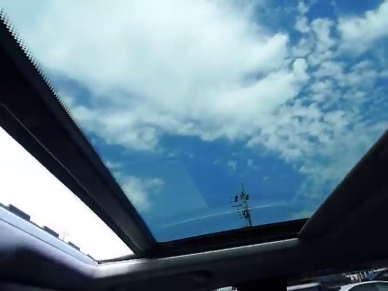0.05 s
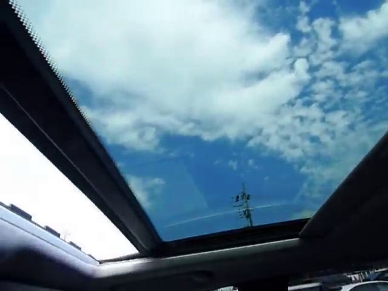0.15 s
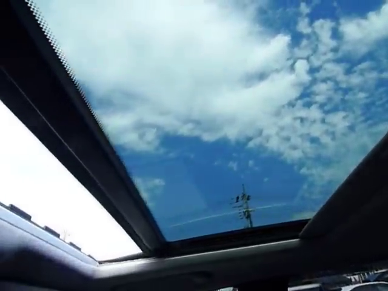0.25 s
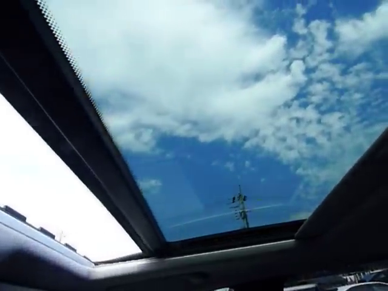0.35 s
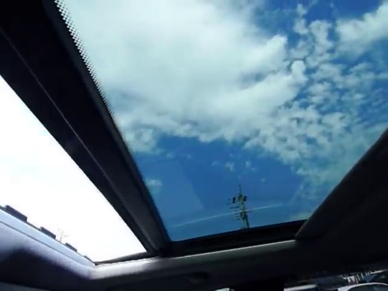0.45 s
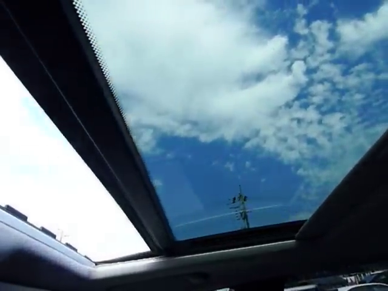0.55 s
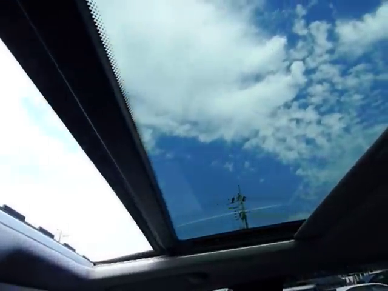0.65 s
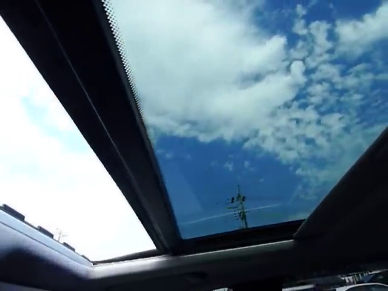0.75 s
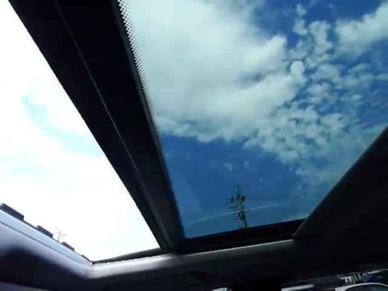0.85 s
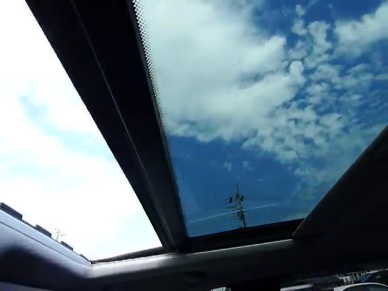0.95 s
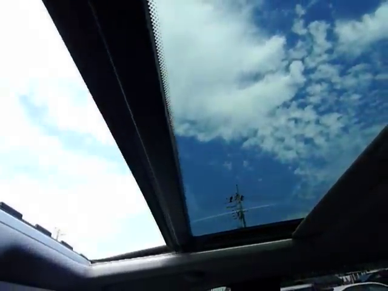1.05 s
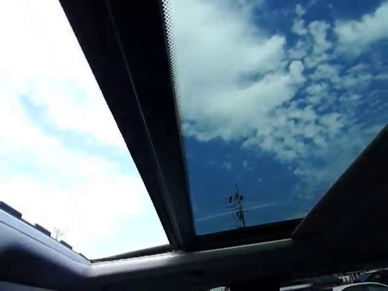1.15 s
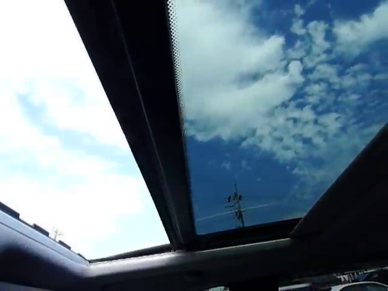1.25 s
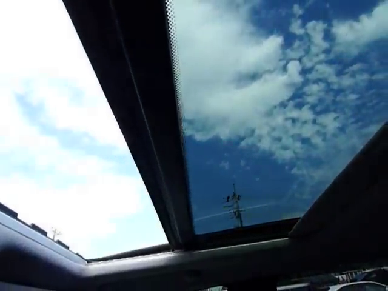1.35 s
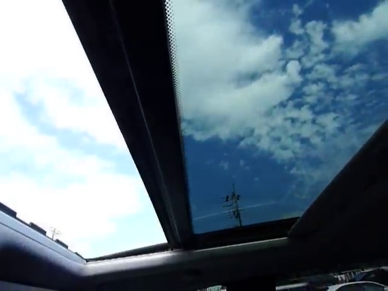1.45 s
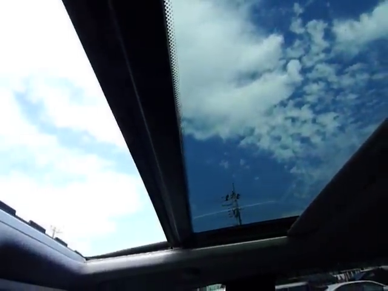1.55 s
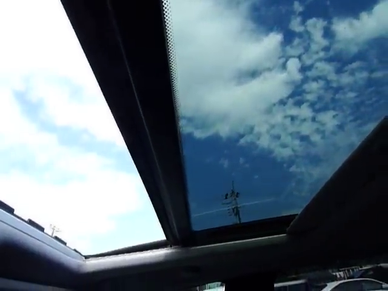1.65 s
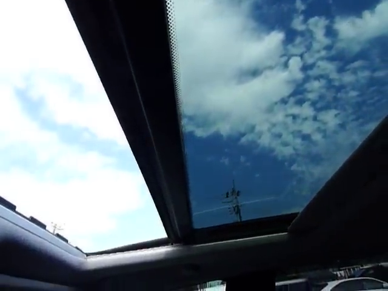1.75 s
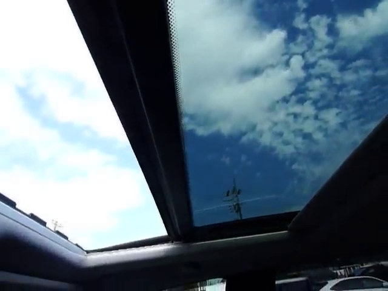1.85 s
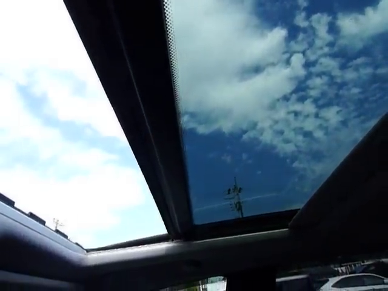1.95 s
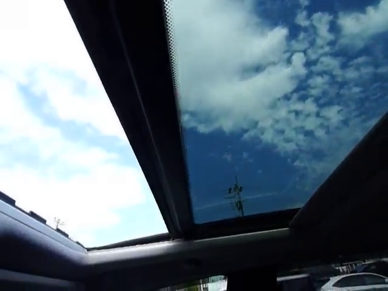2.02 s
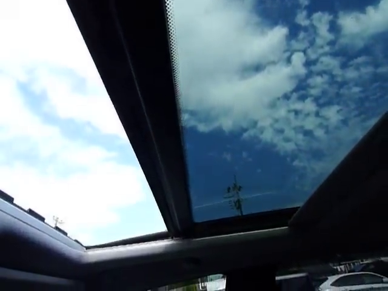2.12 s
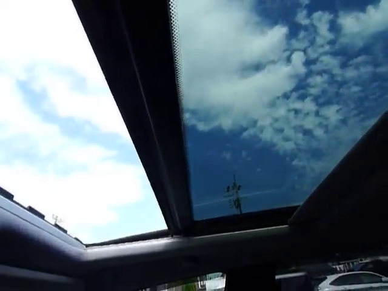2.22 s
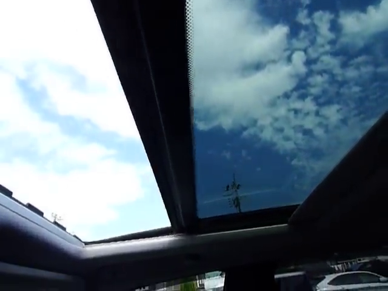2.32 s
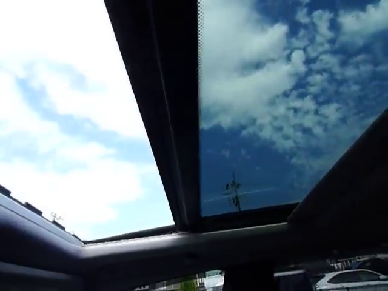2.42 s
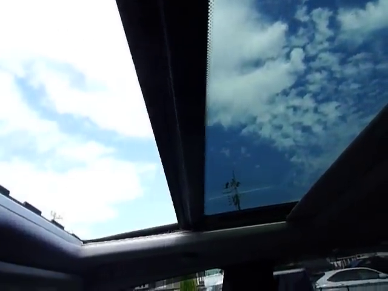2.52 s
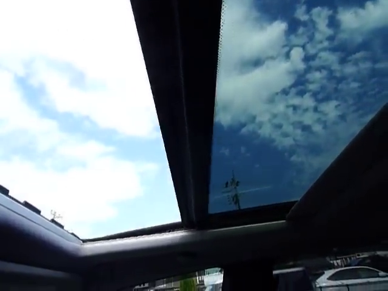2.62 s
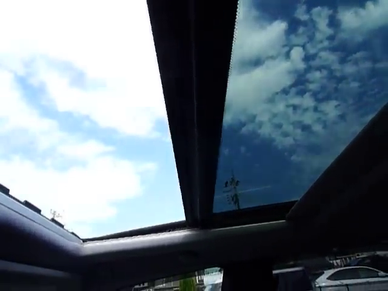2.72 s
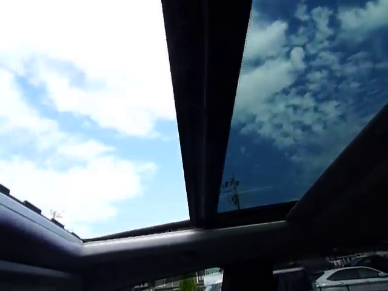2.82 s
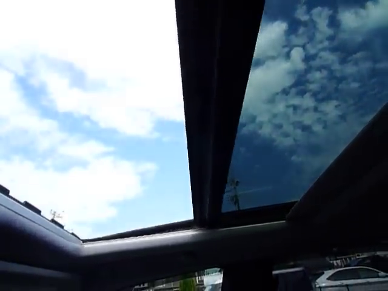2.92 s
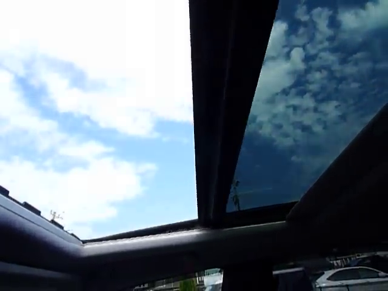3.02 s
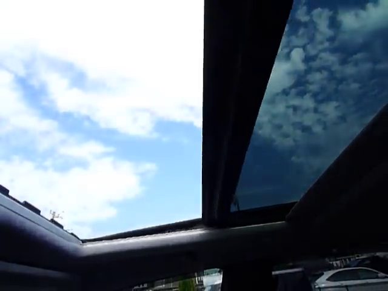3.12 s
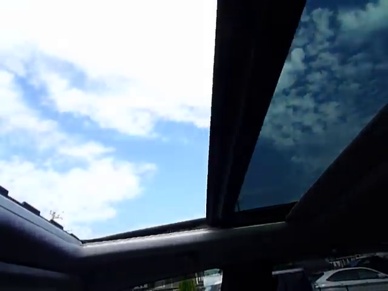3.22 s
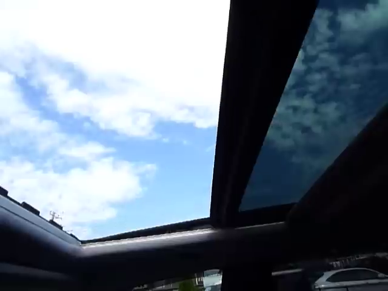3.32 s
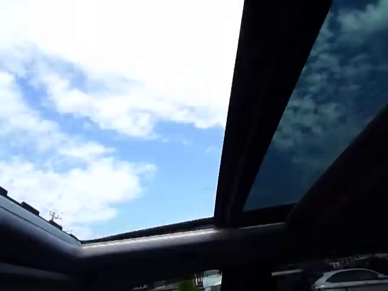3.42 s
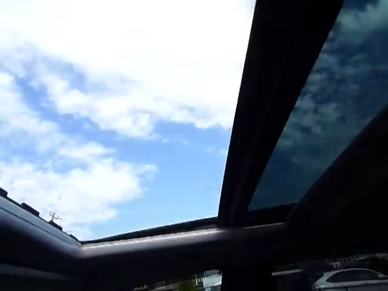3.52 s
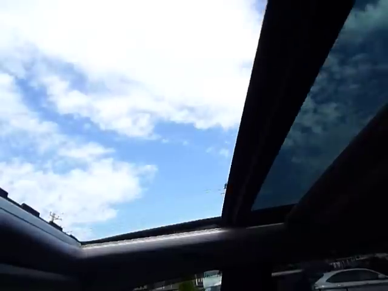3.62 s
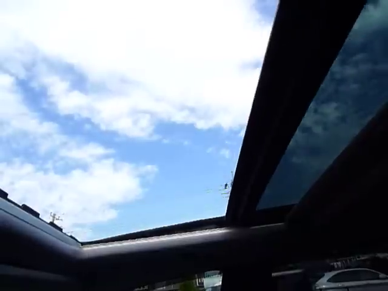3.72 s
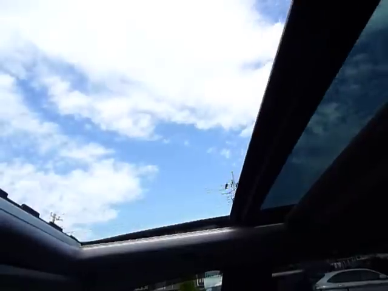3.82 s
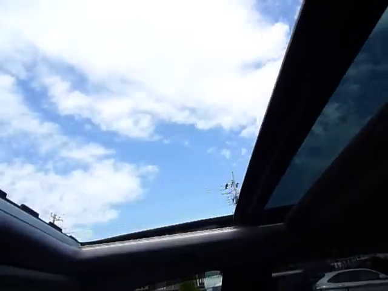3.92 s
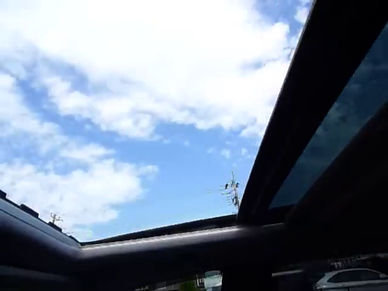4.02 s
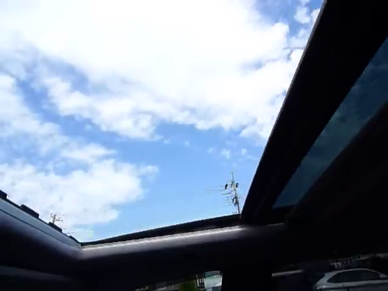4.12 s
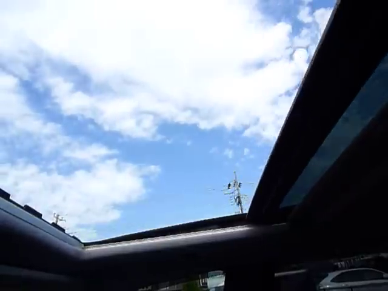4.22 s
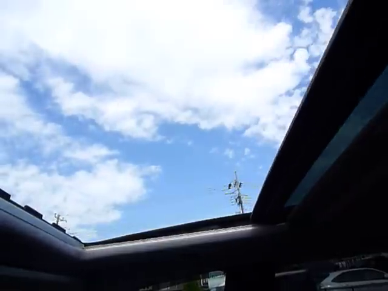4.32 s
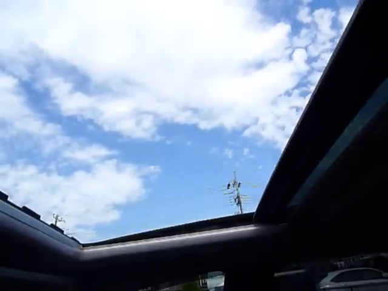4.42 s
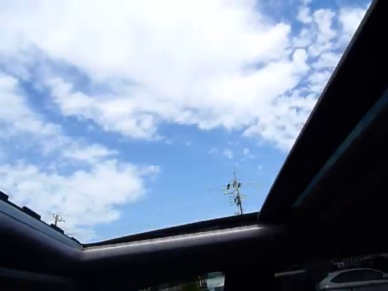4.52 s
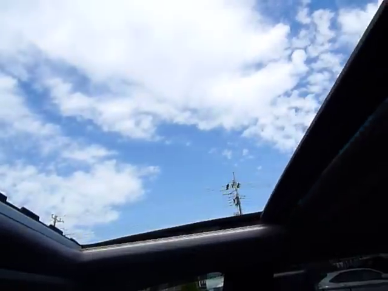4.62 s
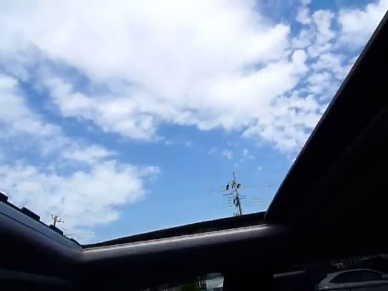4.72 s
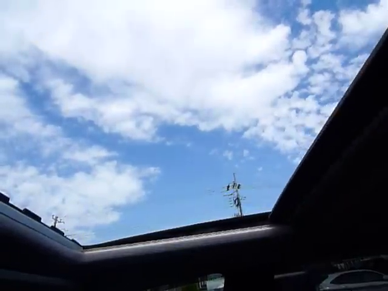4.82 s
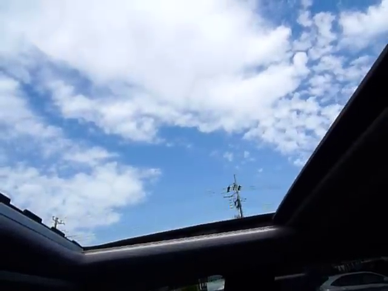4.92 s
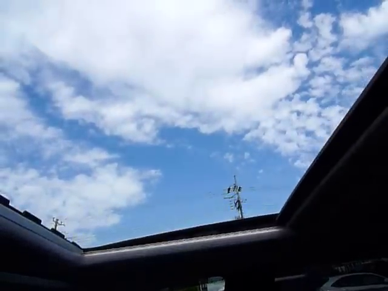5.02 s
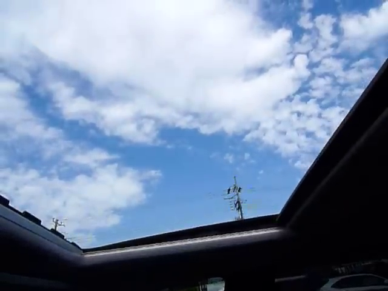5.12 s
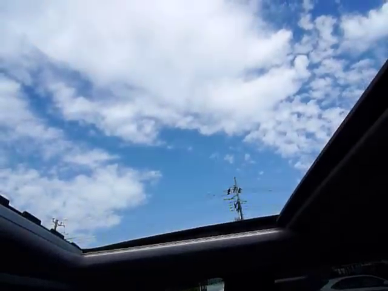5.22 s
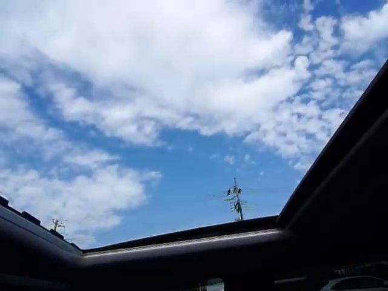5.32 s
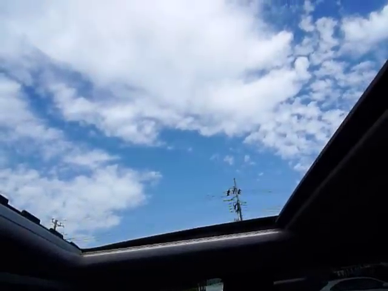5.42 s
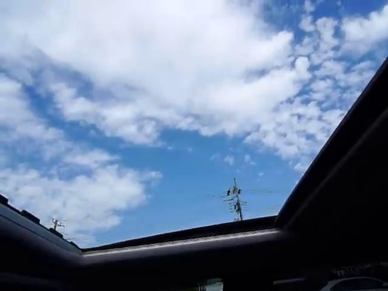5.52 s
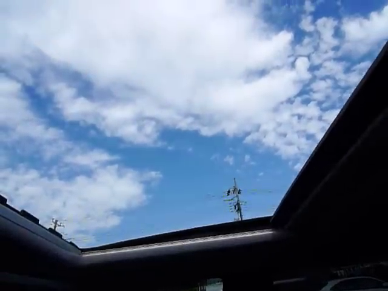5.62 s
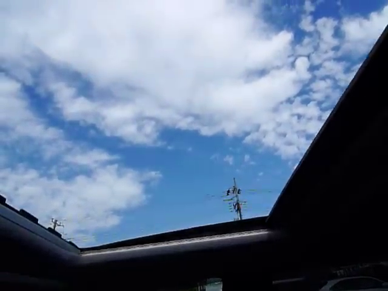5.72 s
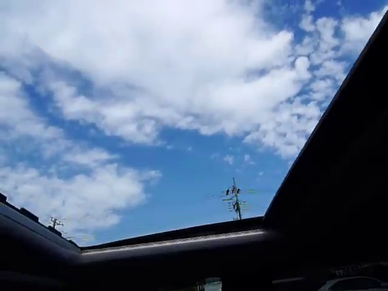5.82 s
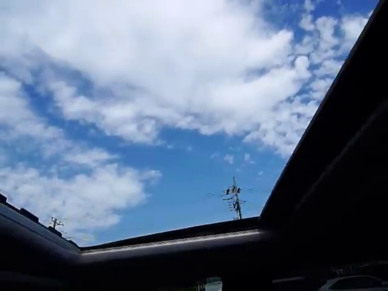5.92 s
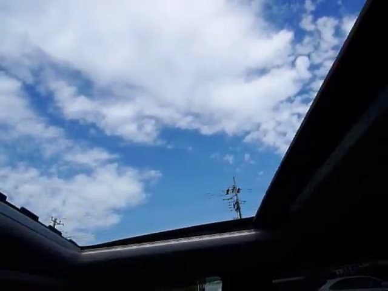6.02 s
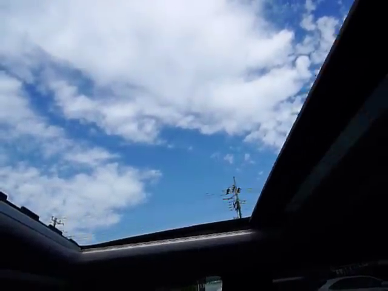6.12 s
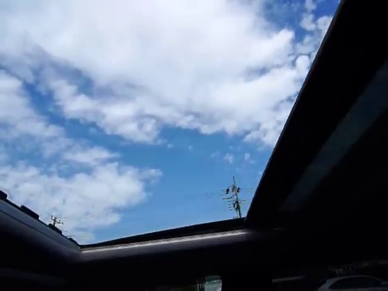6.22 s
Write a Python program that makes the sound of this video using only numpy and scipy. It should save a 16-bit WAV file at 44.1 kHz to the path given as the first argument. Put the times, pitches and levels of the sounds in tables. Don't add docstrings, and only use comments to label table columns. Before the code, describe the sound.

A small motor slides a glass car roof open, buzzing and whirring, stopping with clacks and thuds over low engine and blower hum.

```python
import sys
import numpy as np
from scipy import signal
from scipy.fft import rfft, irfft, next_fast_len
from scipy.io import wavfile
from scipy.ndimage import map_coordinates

SR = 44100
rng = np.random.default_rng(int(sys.argv[2]) if len(sys.argv) > 2 else 0)


def transcribe(u):
    v = np.clip(np.atleast_2d(u).T, -1, 1)
    q = np.round(v * 32767).astype(np.int16)
    wavfile.write(sys.argv[1], SR, q)


def elevation(decibels):
    levels = np.asarray(decibels, float)
    return 10 ** (levels / 20)


N = 276066


def along(points, hz):
    f, v = np.transpose(points)
    return np.interp(np.log(hz + 1), np.log(f + 1), v)


def curves(rows):
    s, *cols = np.transpose(rows)
    return [np.interp(np.arange(N) / SR, s, c) for c in cols]


def wobble(rate):
    knots = rng.standard_normal(int(N * rate / SR) + 4)
    return map_coordinates(knots, [np.arange(N) * rate / SR])


def filtered(x, response):
    m = next_fast_len(len(x) + 8192)
    spectrum = rfft(x, m) * response(np.fft.rfftfreq(m, 1 / SR))
    return irfft(spectrum, m)[:len(x)]


def resonance(centre_hz, width_hz):
    return lambda f: 1j * f * width_hz / (centre_hz ** 2 - f * f + 1j * f * width_hz)


def rush(spectrum):
    x = filtered(rng.standard_normal(N), lambda hz: elevation(along(spectrum, hz)))
    return x / np.std(x)


def tone(hz, blur):
    phase = 2 * np.pi * np.cumsum(hz) / SR
    return np.sqrt(2) * np.sin(phase + blur * wobble(60))


def idle():
    # f/Hz, level/dB rms, pitch wander/Hz, level sway/dB
    hums = [
        (36.5, -56, .8, 2.2),
        (137.7, -48.5, 1, 1.5),
        (276, -61, 2, 3),
        (549, -58.5, 2, 2),
    ]
    # f/Hz, density/dB per Hz
    cabin = [(15, -34), (30, -16.5), (50, -17), (85, -16), (115, -9), (200, -12), (330, -9.5), (430, -15.5),
             (600, -14), (900, -17.5), (1150, -24.5), (1900, -28), (3500, -34.5), (4100, -47)]
    hum = 0
    for hz, db, wander_hz, sway_db in hums:
        level = elevation(db + sway_db * wobble(4.56))
        hum = hum + level * tone(hz + wander_hz * wobble(3), blur=0.054)
    noise = rush(cabin)
    rumble = filtered(noise, lambda f: 1 / (1 + (f / 300) ** 4))
    airy = noise - rumble
    return hum + elevation(0.62 * wobble(5)) * (elevation(-44.5) * rumble + elevation(-44) * airy)


def bird():
    # t/s, length/s, start f/Hz, end f/Hz, level/dB
    chirps = [
        (5.23, .012, 4300, 3800, -62),
        (5.246, .022, 3600, 3950, -57),
        (5.267, .014, 3600, 3350, -51),
        (5.285, .016, 3500, 3900, -61),
    ]
    out, t = np.zeros(N), np.arange(SR // 10) / SR
    for s, length, start_hz, end_hz, db in chirps:
        n = round(length * SR)
        glide_hz = np.linspace(start_hz, end_hz, n)
        whistle = np.hanning(n) * np.sin(2 * np.pi * np.cumsum(glide_hz) / SR)
        out[round(s * SR):][:n] += elevation(db) * whistle
    echoes = rng.standard_normal(len(t)) * elevation(-60 * t / .15)
    return out + .6 * signal.fftconvolve(out, echoes / np.linalg.norm(echoes))[:N]


def rings(events, spread, swell):
    out, t = np.zeros(N + SR), np.arange(SR // 2) / SR
    for (s, db, hz, t60), detunings in zip(events, rng.standard_normal((len(events), 4))):
        near = sum(0.3 * np.sin(2 * np.pi * hz * np.exp(spread * d) * t) for d in detunings)
        attack = (1 - np.exp(-t * hz / swell)) ** 2
        ring = (np.sin(2 * np.pi * hz * t) + near) * elevation(-60 * t / t60) * attack
        out[round(s * SR):][:len(t)] += elevation(db - 1.0) * ring / np.abs(ring).max()
    return out[:N]


def higher_knocks():
    # t/s, peak level/dB, f/Hz, t60/s
    high_blows = [(2.218, -27.5, 617, 0.14), (2.245, -23.5, 485, 0.063), (2.545, -26.5, 626, 0.16),
                  (3.225, -24, 494, 0.033), (4.074, -30.5, 403, 0.1), (5.058, -27.5, 432, 0.12),
                  (5.41, -33.5, 623, 0.11)]
    return rings(high_blows, spread=0.13, swell=0.6)


def thuds():
    # t/s, peak level/dB, f/Hz, t60/s
    booms = [
        (2.248, -28.5, 181.6, 0.55),
        (2.287, -30.5, 138.4, 0.28),
        (5.527, -27, 161, 0.21),
        (5.56, -40, 204, 0.35),
    ]
    return rings(booms, spread=0.16, swell=0.77)


def knocks():
    # t/s, peak level/dB, f/Hz, t60/s
    blows = [(0.426, -18, 467, 0.064), (0.439, -29, 400, 0.07), (1.226, -25, 410, 0.11),
             (1.236, -24.5, 298, 0.097), (1.912, -29, 288, 0.12), (2.166, -30, 285, 0.1),
             (2.216, -22, 296, 0.068), (2.23, -23, 263, 0.08), (2.244, -23.5, 283, 0.11),
             (2.257, -31, 275, 0.044), (2.287, -29, 268, 0.058), (2.544, -28, 463, 0.11),
             (3.223, -25, 700, 0.082), (3.617, -26.5, 260, 0.049), (3.933, -25, 434.6, 0.17),
             (5.057, -20.5, 297, 0.092), (5.469, -26, 400, 0.19), (5.482, -20, 317, 0.12),
             (5.527, -22, 758, 0.05), (5.537, -23, 284.5, 0.14), (5.546, -15.5, 311, 0.08)]
    return rings(blows, spread=0.168, swell=0.4)


def clicks():
    # t/s, peak level/dB, bright part level/dB, t60/s
    contacts = [(0.4258, -10.5, -34, 0.073), (0.5241, -17.5, -26, .099), (.813, -18.5, -5, 0.11),
                (1.2271, -19.5, -29, 0.083), (1.785, -28.5, -15, .1), (1.902, -27, 0, 0.13),
                (2.1445, -26.5, -21, .27), (2.1687, -24.5, -13.5, 0.23), (2.1874, -21, -19, 0.052),
                (2.2171, -12, -25, 0.057), (2.23, -20, -27, 0.12), (2.2514, -14, -24, 0.024),
                (2.5449, -9.5, -35, .033), (3.224, -9, -2.5, .066), (3.614, -20, -1.5, 0.21),
                (3.9358, -16, -30, 0.1), (4.042, -21, -1, .071), (4.0501, -24, -13, .037),
                (4.0712, -10.5, -14, 0.067), (4.0845, -11.5, -28, 0.029), (5.4084, -23.5, -13, 0.11),
                (5.4193, -28, -22, .09), (5.469, -21, -18, .12), (5.4834, -20, -24, 0.12),
                (5.5115, -19, -25, .09), (5.5225, -9, -22, 0.047), (5.5357, -18, -25, 0.097),
                (5.5468, -25.5, -24, .12)]
    # f/Hz, width/Hz
    modes = [(630, 140), (880, 240), (1090, 45), (1290, 100), (1650, 240), (1900, 150), (2150, 90),
             (2420, 150), (2750, 400), (3250, 180), (3830, 49), (4500, 170)]
    out, t = np.zeros(N + SR), np.arange(SR // 5) / SR
    rise = 1 - np.exp(-t / 0.000067)

    def panel(f):
        return 0.49 + sum(resonance(hz, width)(f) for hz, width in modes)

    def body_response(f):
        return panel(f) * resonance(1160, 1740)(f) ** 2 / (1 + 1j * f / 2500) ** 2

    def bright_response(f):
        return panel(f) * resonance(3000, 2600)(f) ** 2

    grits = rng.standard_normal((len(contacts), 2, len(t)))
    for (s, db, bright_db, t60), grit in zip(contacts, grits):
        body = filtered(grit[0] * rise * elevation(-60 * t / t60), body_response)
        bright = filtered(grit[1] * rise * elevation(-95 * t / t60), bright_response)
        crack = body / np.abs(body).max() + elevation(bright_db - 3.5) * bright / np.abs(bright).max()
        out[round(s * SR):][:len(t)] += elevation(db - 8.5) * crack
    return out[:N]


def snaps():
    # t/s, peak level/dB, centre f/Hz, width/Hz
    impacts = [(0.427, -22.5, 2000, 2200), (2.17, -39, 2800, 700), (2.187, -31, 2720, 596),
               (2.2167, -28, 1400, 1400), (2.247, -21, 1920, 500), (2.2512, -22, 1900, 600),
               (2.545, -21, 2480, 800), (3.225, -5.5, 2090, 3000), (3.2261, -27, 2200, 1810),
               (3.228, -15, 1830, 1500), (3.616, -24.5, 2820, 700), (3.9353, -22, 2190, 1960),
               (4.0692, -20, 1070, 500), (4.0798, -26, 950, 600), (5.522, -8.5, 766, 323),
               (5.5232, -17.5, 1640, 1200)]
    out, push = np.zeros(N), np.eye(1, 400)[0]
    for s, db, hz, width_hz in impacts:
        snap = filtered(push, lambda f: resonance(hz, width_hz)(f) ** 2)
        out[round(s * SR):][:len(push)] += elevation(db) * snap / np.abs(snap).max()
    return out


def motor(burst, speed):
    # f/Hz, density/dB per Hz
    rails = [(90, -39.5), (160, -12), (360, -10), (430, -4.5), (480, -5.5), (830, -9), (1010, -13),
             (1280, -7.5), (1430, -14.5), (1650, -10.5), (2000, -14), (3300, -21), (4000, -32), (5200, -33)]
    # f/Hz, width/Hz, level/dB rms
    sings = [(395, 80, -53), (438, 66, -42), (476, 64, -41.5), (790, 90, -42), (827, 38, -44),
             (870, 26, -48), (900, 40, -54), (930, 50, -48), (968, 50, -51), (1215, 70, -55),
             (1283, 80, -51)]
    t = np.arange(N) / SR
    start, stop, first_db, last_db, run_up = burst
    free_hz, effort_db = curves(speed)
    hz = free_hz - 60 * np.exp(-((t - 4.105) / .115) ** 2)
    coast = np.exp(-np.clip(t - stop, 0, None) / 0.01)
    on = np.clip((t - start) / run_up + 1, 0, 1) * coast

    def roof(f):
        return np.sqrt(sum(elevation(2 * db) / (1 + (2 * (f - c) / width) ** 2) ** 4 for c, width, db in sings))

    whine = 0
    for k in (1, 2, 3):
        level = roof(k * hz) * elevation(effort_db + .5 + 1.5 * wobble(20))
        whine = whine + level * tone(k * hz, blur=.06 + .08 * k)
    travel = np.clip((t - start) / (stop - start), 0, 1) ** 1.76
    judder = elevation(.5 * wobble(12) + .6 * wobble(70))
    cables = elevation(first_db + (last_db - first_db) * travel + 5) * judder * rush(rails)
    return on * (on ** 2 * whine + cables)


def sliding_roof():
    # start t/s, stop t/s, cable rush at start/dB, at stop/dB, run-up/s
    bursts = [
        (0, 1.226, -42.5, -42, .03),
        (2.256, 5.066, -42, -48, .038),
        (5.576, 6.26, -49.5, -47, .06),
    ]
    # t/s, commutator f/Hz, effort/dB
    loads = [
        [(0, 437, 0), (.35, 441, 0), (.7, 428, 0), (.86, 427, 0), (.96, 412, 0), (1.24, 413, 1)],
        [(2.25, 426, -3), (2.95, 428, 0), (3.05, 434, 0), (3.27, 435, 0), (3.63, 411, 0), (3.73, 449, -2),
         (4.4, 437, 2.5), (4.75, 421, 1.5), (5.06, 397, 1)],
        [(5.56, 448, -5), (5.7, 454, 0), (5.86, 463, 1), (6.12, 485, 0), (6.26, 481, -1)],
    ]
    return sum(motor(burst, speed) for burst, speed in zip(bursts, loads))


def scene():
    hits = higher_knocks() + thuds() + knocks() + clicks() + snaps()
    return (idle() + bird() + hits + sliding_roof())[None]


def dulled(x):
    return signal.sosfilt(signal.butter(10, 4250, fs=SR, output="sos"), x)


def amplifier():
    # f/Hz, density/dB per Hz
    hiss = [(200, 0.5), (5000, -1.5), (7300, -2), (7900, -6), (8400, -15), (8900, -31), (10000, -90)]
    whistle = elevation(-89) * np.sin(2 * np.pi * 6222 * np.arange(N) / SR)
    return elevation(-66.5) * rush(hiss) + whistle - .0033


def band_limit(x):
    return signal.sosfilt(signal.butter(12, 8820, fs=SR, output="sos"), x)


def record(dry):
    mix = dulled(dry) + amplifier()
    return band_limit(mix)


dry = scene()
out = record(dry)
transcribe(out)
```